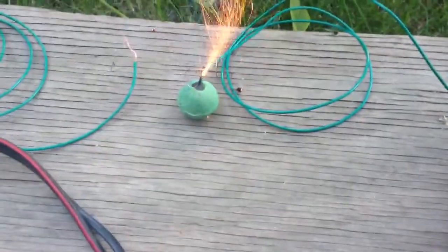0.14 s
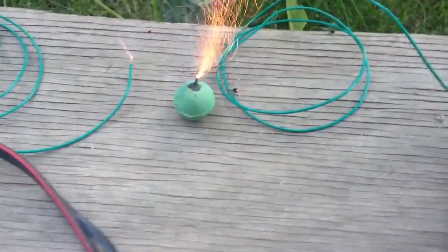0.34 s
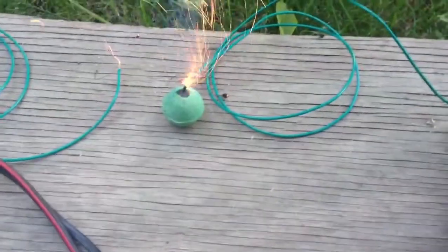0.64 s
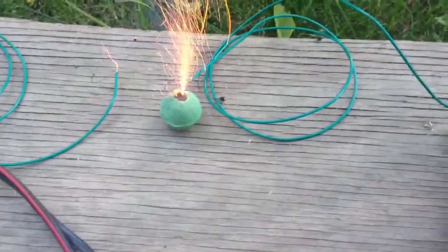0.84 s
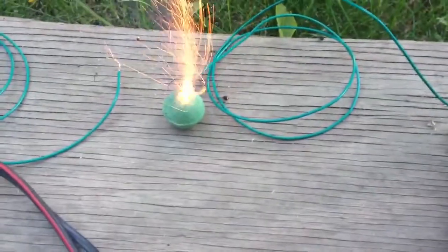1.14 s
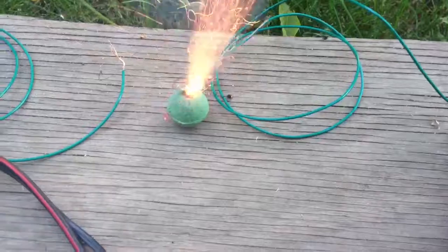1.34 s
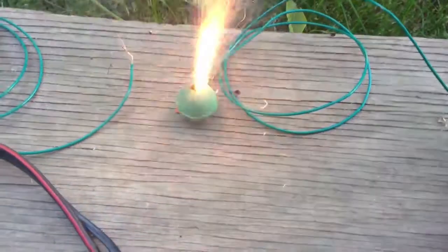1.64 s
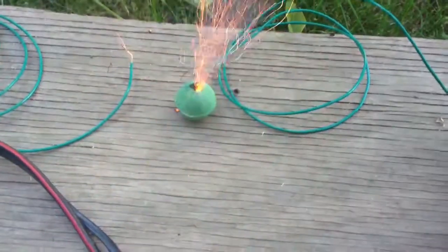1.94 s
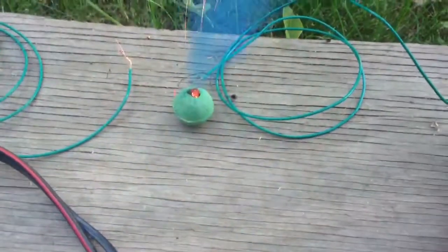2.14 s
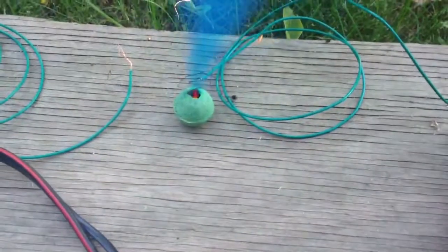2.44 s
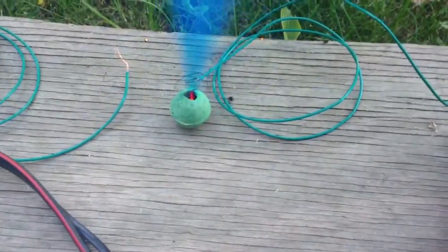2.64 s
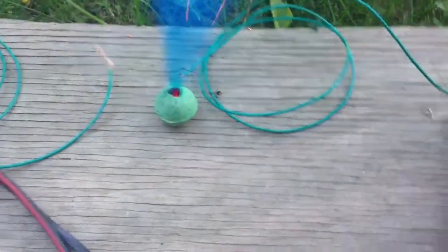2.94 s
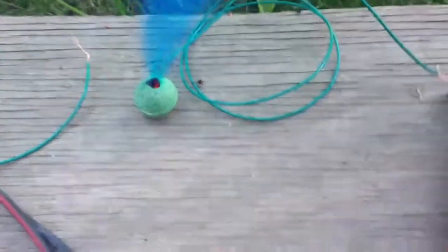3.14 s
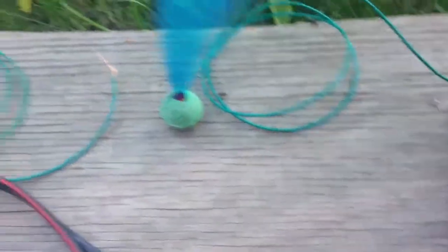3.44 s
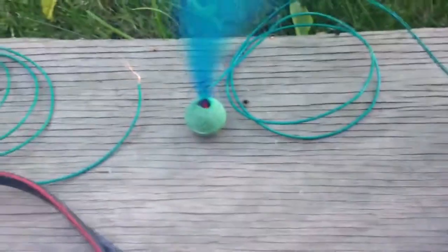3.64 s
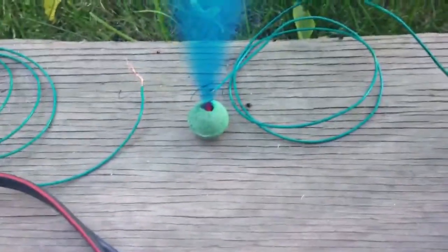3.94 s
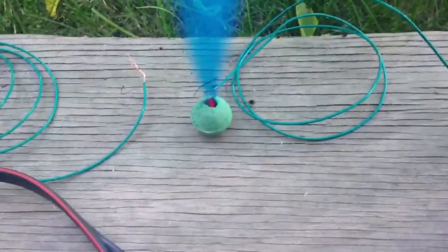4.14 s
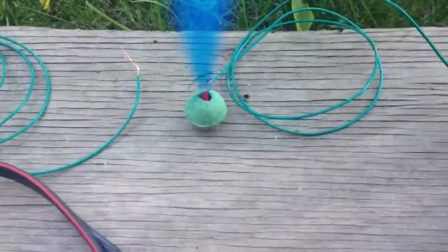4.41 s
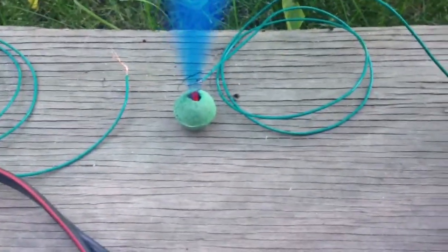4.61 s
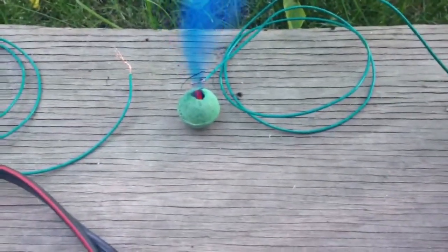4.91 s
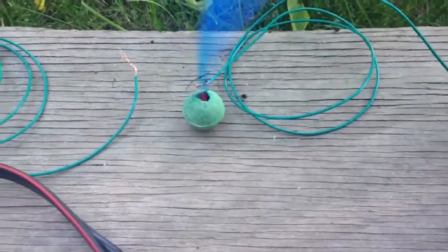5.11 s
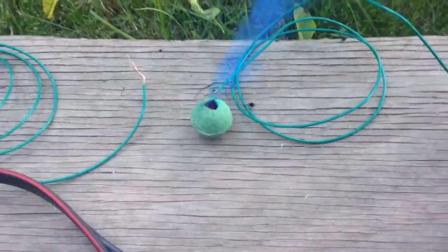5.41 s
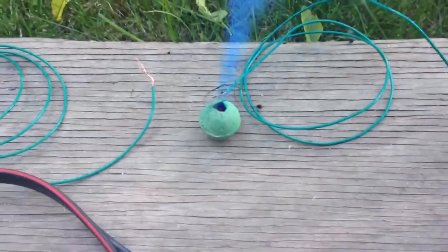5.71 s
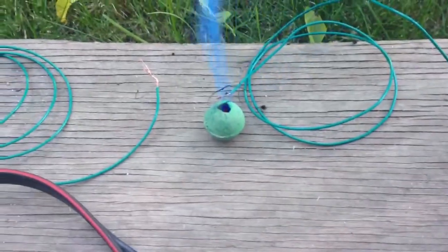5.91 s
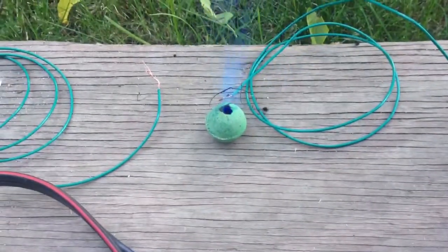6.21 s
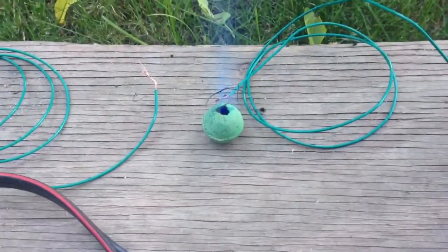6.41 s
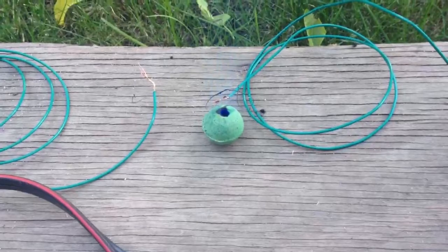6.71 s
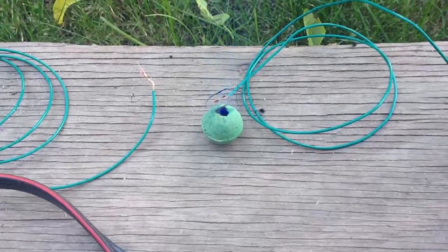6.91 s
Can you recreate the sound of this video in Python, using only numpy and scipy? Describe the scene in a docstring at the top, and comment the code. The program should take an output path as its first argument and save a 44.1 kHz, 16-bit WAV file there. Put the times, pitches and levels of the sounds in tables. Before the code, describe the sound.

A small firework's fuse sputters softly, pops and flares, then smoke jets out in a loud rushing hiss that fades to faint birdsong outdoors.

```python
"""Outdoors, on a wooden board close to a hand-held camera, a smoke ball burns: its fuse sputters, the
charge flares, and smoke hisses from the vent, clears with a pop and dies away. The jet is noise in three
bands, combed by the board's reflection; the flame is low fluttering noise. Pops and knocks are damped
modes, snaps are short noise bursts. A distant bird of gliding sines and its echoes comes through a light
breeze of low rumble and a steady outdoor wash."""
import sys
import numpy as np
from scipy import signal
from scipy.fft import rfft, irfft, next_fast_len
from scipy.io import wavfile
from scipy.ndimage import uniform_filter1d

SR = 44100
rng = np.random.default_rng(int(sys.argv[2]) if len(sys.argv) > 2 else 0)


def digitize_waveform(pressure):
    """Quantize a signal to 16-bit integers and store it at the path in sys.argv[1].

    Rows of a 2-D input are taken as channels; values are limited to [-1, 1].
    """
    field = np.atleast_2d(pressure).T
    bounded = np.clip(field, -1, 1)
    quanta = np.round(bounded * 32767).astype(np.int16)
    wavfile.write(sys.argv[1], SR, quanta)


N = 311346
TIME = np.arange(N) / SR
FRAME, HOP = 2048, 512  # samples per spectral frame, and from one frame to the next
BINS = np.fft.rfftfreq(FRAME, 1 / SR)
FRAMES = np.arange(N // HOP + 5) * HOP / SR

# how hard the powder burns, before spurts and clearings: (time [s], hiss level [dB])
BURN = [(0, -41), (.78, -40.5), (.85, -37), (1.34, -36.5), (1.52, -42.5), (1.8, -37), (1.825, -33.5),
        (2.72, -28), (3.96, -31), (4.18, -37), (4.34, -44), (4.52, -46), (4.74, -52), (4.9, -58),
        (5.5, -66), (7, -68.5)]
# brief spurts (+) and lulls (-) of the burn:
# (time [s], half width to 1/e [s], change of hiss [dB], extra fizz [dB])
SPURTS = [(.06, 0.02, -1.5, 2), (.179, 0.041, 5.5, 1), (.326, 0.05, 4, 3.5), (.443, 0.038, 3, 4),
          (.524, .018, 3.5, 2), (.623, 0.043, -6.5, 5), (1.038, 0.029, -1.5, -1.5), (1.255, 0.037, 0.5, 5),
          (1.338, 0.045, 3.5, -0.5), (1.58, 0.033, 2.5, 1.5), (1.665, 0.035, -3, 6.5),
          (2.966, 0.042, -3, -1.5), (3.213, 0.053, 4.5, 0.5), (5.018, .03, 13, 2)]
# the vent blows clear, the hiss collapses, then it builds as slag narrows the hole again:
# (middle of the fall [s], fall time [s], drop before recovery [dB], recovery time constant [s],
#  lasting gain of the roar [dB])
CLEARINGS = [(2.056, 0.093, 15.5, 0.33, 0), (3.227, 0.032, 12, 0.19, 3)]
# relative spectral density of the jet: (frequency [Hz], density [dB per Hz])
JET_COLOUR = [(40, -48), (110, -25), (200, -12.5), (310, -10), (450, 0.5), (670, -4.5), (780, 1),
              (1250, -0.5), (2200, -1.5), (3900, -1), (6300, 6), (8000, 3.5), (9700, -5), (15200, -9.5)]
# change of the jet's colour in the full flame: (frequency [Hz], change [dB])
FLAME_TINT = [(900, 6.5), (2800, -0.5), (4400, 4), (8000, 4.5), (10000, -0.5), (15000, 5.5)]
# change of its colour as the pressure runs out: (frequency [Hz], change [dB])
SPENT_TINT = [(250, 1), (750, 4), (1600, 0), (3000, -4.5), (4500, 2), (6000, 1), (8500, -8.5)]
# change of its colour once the pop has widened the vent, which now rings: (frequency [Hz], change [dB])
WIDE_VENT_TINT = [(330, -2), (520, 1), (2500, -.5), (3600, 0), (4200, 3.5), (4800, 2), (5600, 0),
                  (9000, -.5)]
# delay of the board's reflection, which follows the camera's height: (time [s], delay [ms])
BOUNCE_LAG = [(0, 1.293), (.2, 1.296), (.45, 1.31), (1.5, 1.309), (1.7, 1.28), (2.3, 1.267), (2.7, 1.281),
              (2.9, 1.308), (3.1, 1.369), (3.28, 1.379), (3.55, 1.321), (3.75, 1.297), (4.25, 1.292),
              (4.6, 1.309)]
# strength of that reflection: (frequency [Hz], share of the direct sound [ratio])
BOUNCE = [(300, .25), (850, .36), (1400, .24), (2000, .42), (2800, .44), (3500, .1), (6500, .07),
          (9000, .24), (11500, .33), (13500, .55)]
# the open flame, before its flutter: (time [s], level [dB])
FLAME = [(0, -58), (.85, -49.5), (1.25, -50.5), (1.4, -41.5), (1.75, -43), (1.85, -49), (2.03, -48.5),
         (2.6, -77)]
# relative spectral density of the flame: (frequency [Hz], density [dB per Hz])
FLAME_COLOUR = [(30, -46), (90, -12), (190, 7.5), (300, 1), (500, 3.5), (900, -4.5), (1400, -7),
                (3000, -26)]
# low pops and puffs of burning powder: (time [s], peak level [dB], pitch [Hz])
POPS = [(.083, -46, 160), (.852, -28, 157), (.871, -27.5, 204), (.8825, -24.5, 253), (.8891, -15.5, 310),
        (.896, -21, 176), (1.015, -36, 165), (1.11, -29.5, 163), (1.171, -33.5, 192), (1.853, -37.5, 137),
        (3.216, -20.5, 474), (3.2202, -20.5, 600), (3.22, -26, 221), (3.675, -31, 650), (3.855, -41, 215),
        (6.301, -41, 203)]
# dry snaps: a bursting spark, the ticks of the finger knocks near 2.87 s and the crack of the vent's pop at
# 3.22 s: (time [s], peak level [dB], pitch [Hz])
SNAPS = [(1.0685, -25, 7960), (2.867, -22, 3400), (2.8705, -26, 3200), (2.88, -21.5, 3620),
         (3.2205, -24, 2160), (5.006, -45, 6600)]
# dull knocks of fingers on the camera body: (time [s], peak level [dB])
KNOCKS = [(2.7317, -22), (2.744, -28), (2.756, -31), (2.773, -34), (2.785, -29), (2.87, -25), (2.899, -33),
          (2.914, -35)]
# single whistles of the bird, before its waver and echoes:
# (time [s], length [s], first pitch [Hz], last pitch [Hz], relative level [dB])
WHISTLES = [(4.85, 0.24, 4350, 4320, -58), (5.03, 0.26, 4260, 4310, -52), (5.36, 0.025, 3070, 3030, -58),
            (5.37, .13, 7300, 7550, -63.5), (5.555, .07, 6700, 6200, -58), (5.624, .025, 5640, 5200, -54)]
# its runs of like notes:
# (time [s], notes [count], period [s], note length [s], first pitch [Hz], last pitch [Hz],
#  pitch step per note [Hz], relative level mid-run [dB])
TRILLS = [(5.512, 2, .12, .035, 4900, 3850, 0, -47.5), (5.475, 7, .111, .11, 4720, 4620, -60, -51.5),
          (5.738, 4, .108, .025, 4130, 4560, -34, -43), (6.248, 4, 0.14, .065, 3740, 3670, -30, -55)]
# breeze on the microphone, before its gusting: (time [s], level [dB])
BREEZE = [(0, -73), (.9, -55), (1.4, -58), (1.9, -63), (2.15, -78), (5.4, -81), (6.2, -61), (7, -64)]
# relative spectral density of the outdoor background: (frequency [Hz], density [dB per Hz])
AIR_COLOUR = [(25, -30), (60, -43), (110, -4.5), (160, 2), (230, 3), (300, -7.5), (420, -5), (560, -11),
              (850, -9), (1400, -12), (2600, -14), (4100, -10), (5300, -18), (7500, -14.5), (10000, -24),
              (15200, -30.5)]
# the microphone port rings near 1.8 and 4.5 kHz and cancels just above each, here at full share:
# (frequency [Hz], response [dB])
PORT = [(1620, -2), (1770, 2), (1930, -4.5), (2080, .5), (2400, -2.5), (4050, -1.5), (4380, 7), (4570, 4.5),
        (4740, 7), (4920, 0), (5020, -18), (5060, -18), (5140, -4), (5300, 0), (5500, -2), (5800, 3.5),
        (7400, 2.5), (7900, 4), (9500, -2)]

ROAR_DB, FIZZ_DB = -10.5, -5.5  # starting balance relative to the hiss
FLAME_ROAR_DB, FLAME_FIZZ_DB = 9, 6  # the full flame adds to both
OPEN_ROAR, OPEN_FIZZ = 0.38, -0.33  # an open vent is duller: dB per dB of lost hiss
STRONG_DB, WEAK_DB = -28, -49.5  # the smoke jet turns from hiss to roar between these burn levels
WEAK_ROAR_DB, WEAK_FIZZ_DB = 10.5, -6  # change of each at the weaker level
SPURT_ROAR, LULL_ROAR = -0.3, 0.4  # roar gains less in a spurt, sinks further in a lull: dB per dB
SPENT_DB, SPENT_RANGE_DB = -38.5, 14  # the pressure runs out below this burn level, over this range
ROAR_TOP_HZ, FIZZ_BOTTOM_HZ = 3900, 9000  # the hiss lies between
SPARK_SHARE = 0.05  # share of the hiss and fizz power that comes in separate sparks
POP_T60_S, POP_HZ, POP_DAMPING = 0.028, 168, 1.98  # ring time at that pitch; higher pops die faster
TRILL_FADE_DB = -6  # change toward the edges of a run
BREEZE_LOW_HZ, BREEZE_HIGH_HZ = 88, 150  # the band of its rumble
EDGE_HZ = 15420  # the recorder's upper band limit


def jet():
    """Turbulent mixing: gas leaving the vent makes broadband roar, hiss and fizz that sputter together."""
    gas = noise(amp(jet_colour()) * board(), patchy_db=1.75, port_share=0.88)
    low = below(gas, ROAR_TOP_HZ, order=16)
    not_high = below(gas, FIZZ_BOTTOM_HZ, order=16)
    hiss_db, roar_db, fizz_db = vent(TIME)
    roar = evened(low) * amp(hiss_db + roar_db)
    hiss = evened(not_high - low) * amp(hiss_db)
    fizz = evened(gas - not_high) * amp(hiss_db + fizz_db)
    sputter = wobble(hz=54.7)
    crackle = np.sqrt(1 - SPARK_SHARE + SPARK_SHARE * sparks(per_s=450, spread_db=3.5))
    return roar * amp(0.57 * sputter) + (hiss + fizz) * amp(0.65 * sputter) * crackle


def jet_colour():
    """Source spectrum: flame, pressure and vent width tilt the jet's density, in dB per bin and frame."""
    slack = np.clip((SPENT_DB - follow(BURN, FRAMES)) / SPENT_RANGE_DB, 0, 1)
    # weak fizz also changes its slope toward the top: dB per dB of fizz
    brightness_db = vent(FRAMES)[2] + 6
    fizz_slope = colour([(8500, -0.078), (9500, -0.24), (15000, 0.44)])
    flame_db = flame_heat(FRAMES) * colour(FLAME_TINT)
    spent_db = slack * colour(SPENT_TINT)
    widened_db = (FRAMES > CLEARINGS[-1][0]) * colour(WIDE_VENT_TINT)
    return colour(JET_COLOUR) + flame_db + spent_db + brightness_db * fizz_slope + widened_db


def vent(t):
    """Orifice flow: burn and vent opening set the hiss level, and roar and fizz relative to it, in dB."""
    spurt, spurt_fizz = 0, 0
    for s, width, db, fizz_db in SPURTS:
        bump = np.exp(-((t - s) / width) ** 2)
        spurt = spurt + db * bump
        spurt_fizz = spurt_fizz + fizz_db * bump
    burn = follow(BURN, t) + spurt

    lost, widened, smoking = 0, 0, 0
    for s, fall, drop_db, recovery, roar_db in CLEARINGS:
        cleared = np.clip((t - s) / fall + 0.5, 0, 1)
        lost = lost + drop_db * cleared * np.exp(-np.maximum(t - s, 0) / recovery)
        widened = widened + roar_db * cleared
        smoking = np.maximum(smoking, cleared)

    weak = smoking * np.clip((STRONG_DB - burn) / (STRONG_DB - WEAK_DB), 0, 1)
    heat = flame_heat(t)
    spurt_roar = spurt * np.where(spurt > 0, SPURT_ROAR, LULL_ROAR)
    roar = ROAR_DB + FLAME_ROAR_DB * heat + OPEN_ROAR * lost + WEAK_ROAR_DB * weak + spurt_roar + widened
    fizz = FIZZ_DB + FLAME_FIZZ_DB * heat + OPEN_FIZZ * lost + WEAK_FIZZ_DB * weak + spurt_fizz
    return burn - lost, roar, fizz


def sparks(per_s, spread_db):
    """Shot noise: grains burning at random give sub-millisecond power bursts of very uneven size."""
    lit = rng.random(N) < per_s / SR
    size = amp(spread_db * np.minimum(rng.exponential(1, N), 4)) * lit
    decay_s = 0.00014
    power = signal.lfilter([1], [1, -np.exp(-1 / (decay_s * SR))], size ** 2)
    return power / power.mean()


def board():
    """Interference: direct sound and its reflection off the board form a slowly shifting comb."""
    turns = BINS[:, None] * follow(BOUNCE_LAG, FRAMES) / 1000 - 0.14  # phase lag in cycles
    return abs(1 + colour(BOUNCE) * np.exp(-2j * np.pi * turns))


def flame():
    """Combustion noise: the flaring charge flutters with a low roar."""
    flutter_db = 1.0 * wobble(hz=32)
    return noise(amp(colour(FLAME_COLOUR)), patchy_db=2.6, port_share=1) * amp(follow(FLAME, TIME) + flutter_db)


def flame_heat(t):
    """Relative amplitude: strength of the open flame, one at its height."""
    return amp(follow(FLAME, t) - max(db for s, db in FLAME))


def pops():
    """Impulsive expansion: pockets of powder push the air in short, heavily damped oscillations."""
    out = np.zeros(N)
    for s, db, hz in POPS:
        t60 = POP_T60_S * (POP_HZ / hz) ** POP_DAMPING
        add(out, s, amp(db) * ring(hz, t60, rise_cycles=0.64))
    return out


def snaps():
    """Noise-excited resonance: each snap is a few milliseconds of coloured noise."""
    out, t = np.zeros(N), np.arange(SR // 50) / SR
    for s, db, hz in SNAPS:
        burst = rng.standard_normal(len(t)) * amp(-60 * t / 0.015)
        mode = ring(hz, t60=0.0031, rise_cycles=0.27)[:len(t)]
        snap = np.convolve(burst, mode)
        add(out, s, amp(db) * snap / abs(snap).max())
    return out


def knocks():
    """Modal excitation: each touch rings the one low mode of the camera body."""
    out, body = np.zeros(N), ring(hz=304, t60=0.029, rise_cycles=0.52)
    for s, db in KNOCKS:
        add(out, s, amp(db) * body)
    return out


def bird():
    """Frequency modulation and scattering: gliding whistles, blurred by leaves and echoed by the garden."""
    song, waver = np.zeros(N), wobble(hz=298)
    for s, length, first_hz, last_hz, db in list(WHISTLES) + trill_notes():
        count = int(length * SR)
        rough = 0.018 + 0.14 * abs(np.log(last_hz / first_hz))  # wide glides are the roughest
        note_waver = waver[round(s * SR) - count:][:count]
        pitch = np.linspace(first_hz, last_hz, count) * (1 + rough * note_waver)
        whistle = np.sin(2 * np.pi * np.cumsum(pitch) / SR) * signal.windows.tukey(count, 0.6)
        add(song, s, amp(db) * evened(whistle))
    leaves = scattered(song, t60=0.066)
    garden = scattered(song, t60=0.57)
    return amp(-4.0) * song + amp(-10.0) * leaves + amp(-6.0) * garden


def trill_notes():
    """Periodic repetition: evenly paced notes, level or stepping down in pitch, swell mid-run and fade."""
    notes = []
    for s, count, period, length, first_hz, last_hz, step_hz, db in TRILLS:
        count = round(count)
        for k in range(count):
            edge = (2 * k + 1) / count - 1  # zero in mid-run, nearing one at either end
            step = k * step_hz
            level_db = db + TRILL_FADE_DB * edge ** 2
            notes.append((s + k * period, length, first_hz + step, last_hz + step, level_db))
    return notes


def breeze():
    """Wind-induced pressure: moving air buffets the microphone with a lumpy low rumble."""
    gusts = below(rng.standard_normal(N), BREEZE_HIGH_HZ, order=6)
    rumble = evened(gusts - below(gusts, BREEZE_LOW_HZ, order=5))
    return rumble * amp(follow(BREEZE, TIME) + 1.9 * wobble(hz=9))


def air():
    """Diffuse ambience: a steady outdoor wash with a soft, lumpy rumble."""
    return amp(-52.0) * noise(amp(colour(AIR_COLOUR)), patchy_db=1.46, port_share=0.26)


def noise(gain, patchy_db, port_share):
    """Spectral shaping: noise of given gain per bin and frame, in patches; diffuse sound rings the port less."""
    real, imag, patches = rng.standard_normal((3, len(BINS), len(FRAMES)))
    patches = uniform_filter1d(patches, size=4, axis=0)
    patches = evened(uniform_filter1d(patches, size=10, axis=1))
    lag = follow(BOUNCE_LAG, FRAMES)
    port_db = colour(PORT, stretch=(lag / np.median(lag)) ** 0.37)  # the notch shifts as the camera tilts
    spectrum = (real + 1j * imag) * gain * amp(port_share * port_db + patchy_db * patches)
    return evened(signal.istft(spectrum, nperseg=FRAME, noverlap=FRAME - HOP)[1][:N])


def ring(hz, t60, rise_cycles):
    """Damped oscillation: one mode with a soft start and a peak of one radiates by its rate of change."""
    t = np.arange(SR // 5) / SR
    rise = (1 - np.exp(-t * hz / rise_cycles)) ** 2
    motion = -np.cos(2 * np.pi * hz * t) * amp(-60 * t / t60) * rise
    wave = np.diff(motion, prepend=0)
    return wave / abs(wave).max()


def scattered(x, t60):
    """Multiple scattering: a dense cloud of echoes of unit total energy dies exponentially."""
    t = np.arange(SR // 2) / SR
    tail = rng.standard_normal(len(t)) * amp(-60 * t / t60)
    return signal.oaconvolve(x, tail / np.linalg.norm(tail))[:N]


def wobble(hz):
    """Band-limited fluctuation: random motion of unit rms, up to a rate."""
    return evened(below(rng.standard_normal(N), hz, order=4))


def below(x, hz, order=8):
    """Zero-phase filtering: low-pass without delay."""
    size = next_fast_len(len(x) + 4096)
    f = np.fft.rfftfreq(size, 1 / SR)
    return irfft(rfft(x, size) / (1 + (f / hz) ** order), size)[:len(x)]


def colour(points, stretch=1):
    """Log-frequency interpolation: a spectrum as a column of bins; stretch lowers its features."""
    hz, value = np.transpose(points)
    return np.interp(np.log(BINS[:, None] * stretch + 1), np.log(hz + 1), value)


def follow(rows, t):
    """Linear interpolation: reads a curve at the times t."""
    return np.interp(t, *np.transpose(rows))


def amp(db):
    """Logarithmic level: decibels to amplitude gain."""
    return 10 ** (np.asarray(db) / 20)


def evened(x):
    """Power normalisation: scales to an rms of one."""
    return x / np.sqrt(np.mean(x ** 2) + 1e-20)


def add(mix, s, sound):
    """Superposition: mixes a sound in at s seconds."""
    part = mix[max(round(s * SR), 0):][:len(sound)]
    part += sound[:len(part)]


def scene():
    """Superposition: all sources reach one microphone, the same in both channels."""
    mono = jet() + flame() + pops() + snaps() + knocks() + bird() + breeze() + air()
    return np.array([mono, mono])


def record(dry):
    """Band limiting: the recorder cuts the bass and ends steeply at the top."""
    thin = signal.sosfilt(signal.butter(3, 55, "highpass", fs=SR, output="sos"), dry)
    band_limit = signal.firwin(801, EDGE_HZ, window=("kaiser", 9), fs=SR)
    return signal.oaconvolve(thin, band_limit[None], "same")


dry = scene()
out = record(dry)
digitize_waveform(out)
```